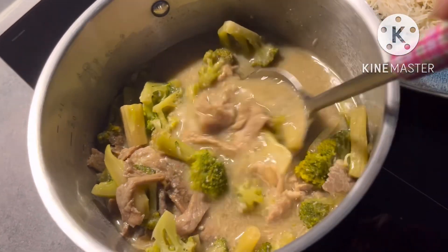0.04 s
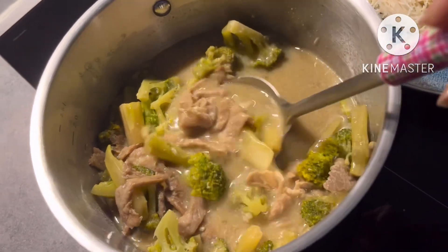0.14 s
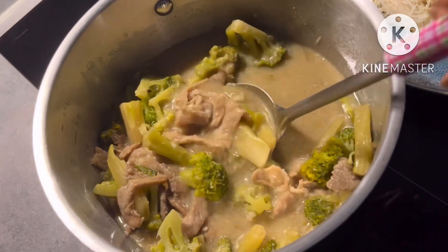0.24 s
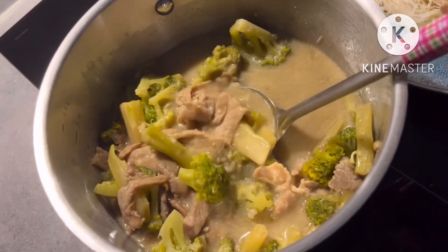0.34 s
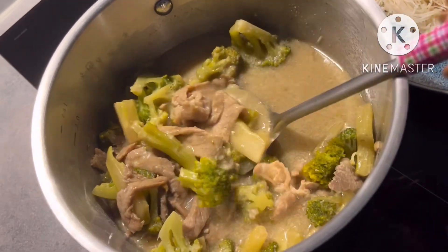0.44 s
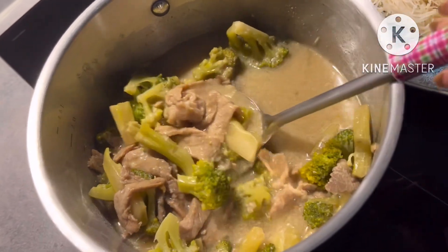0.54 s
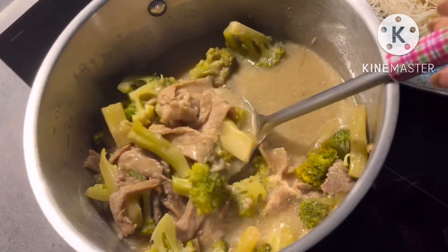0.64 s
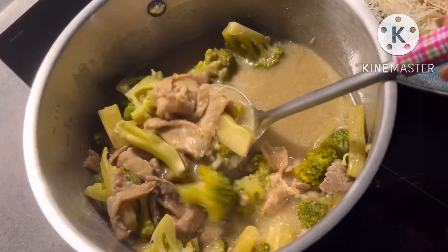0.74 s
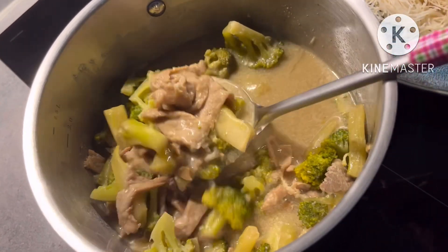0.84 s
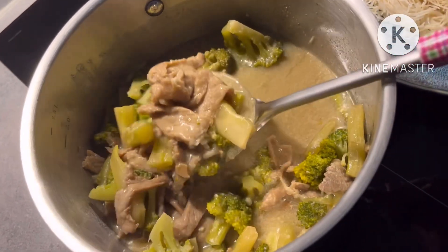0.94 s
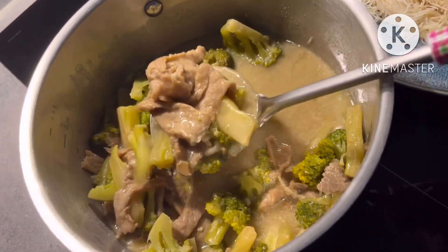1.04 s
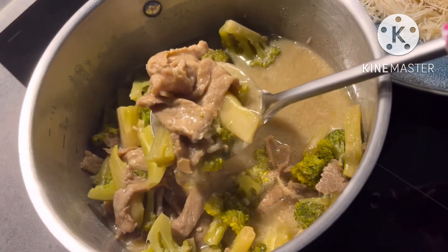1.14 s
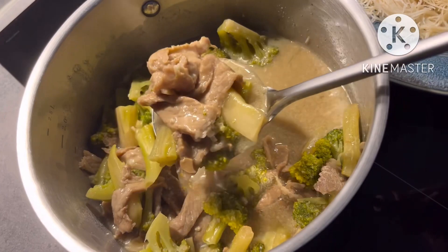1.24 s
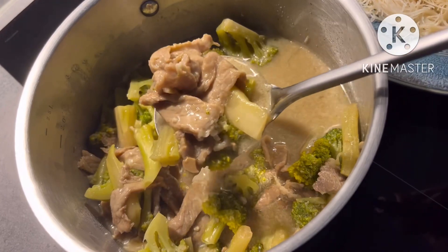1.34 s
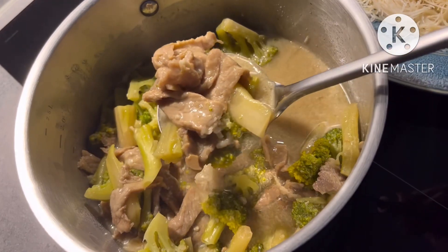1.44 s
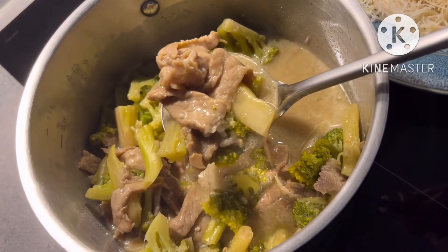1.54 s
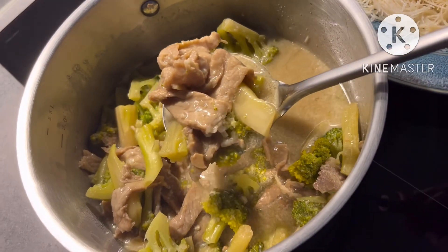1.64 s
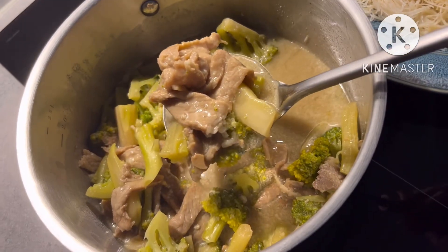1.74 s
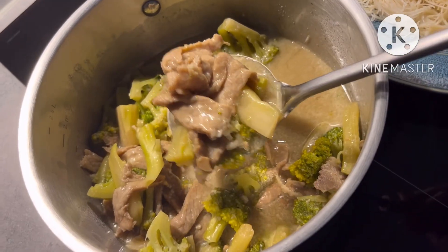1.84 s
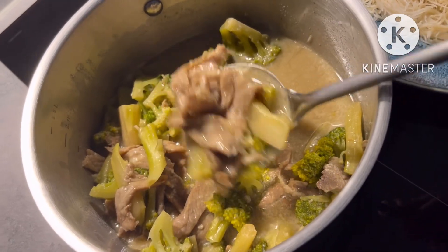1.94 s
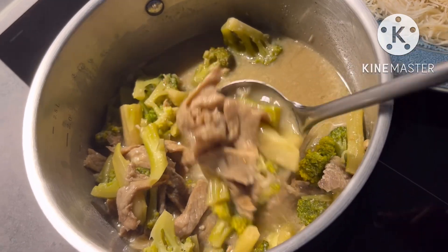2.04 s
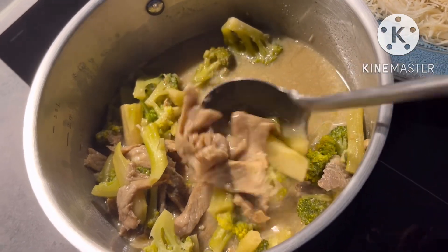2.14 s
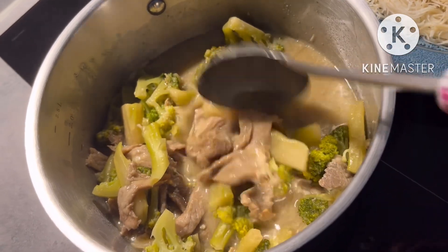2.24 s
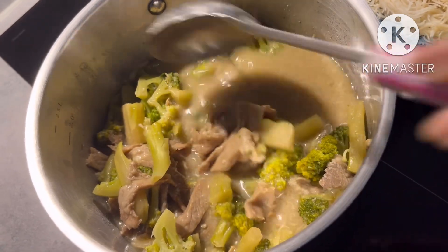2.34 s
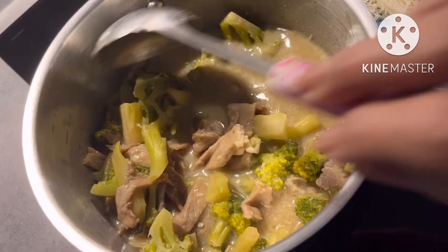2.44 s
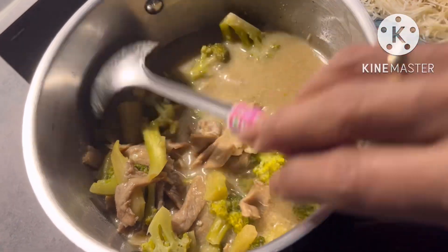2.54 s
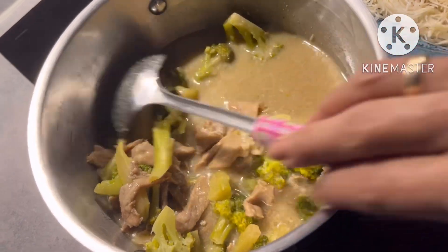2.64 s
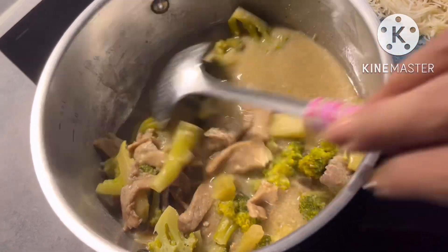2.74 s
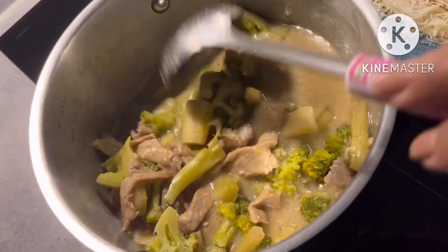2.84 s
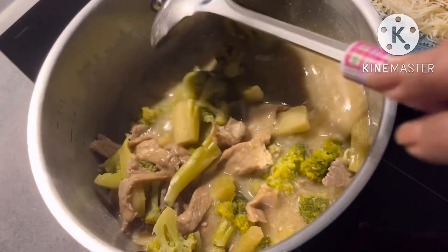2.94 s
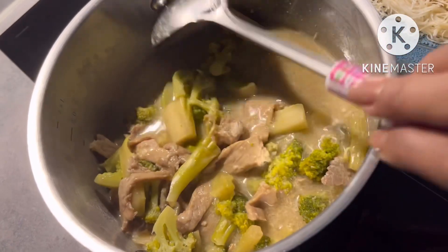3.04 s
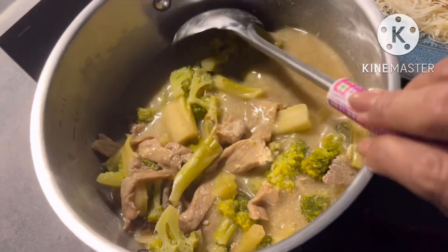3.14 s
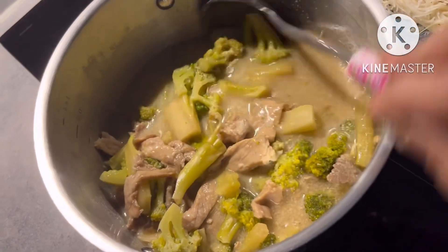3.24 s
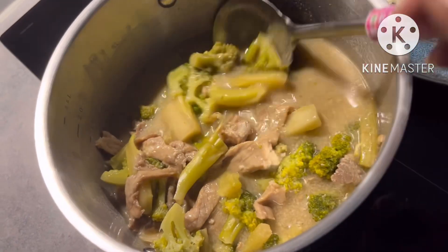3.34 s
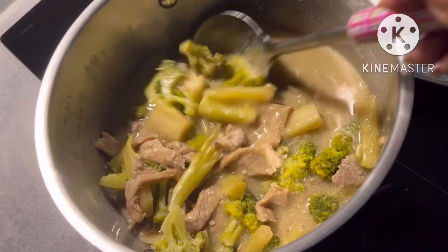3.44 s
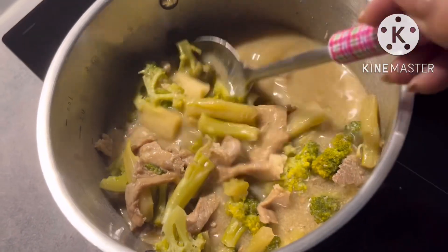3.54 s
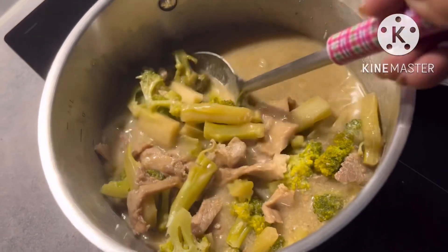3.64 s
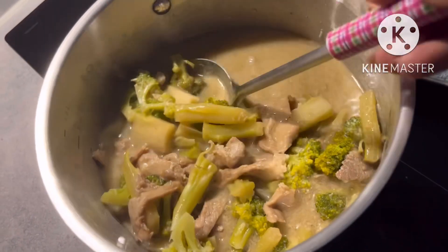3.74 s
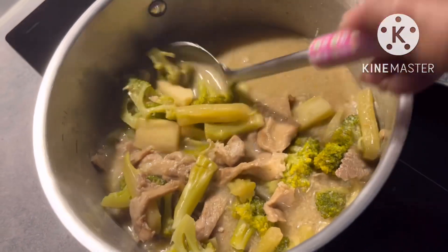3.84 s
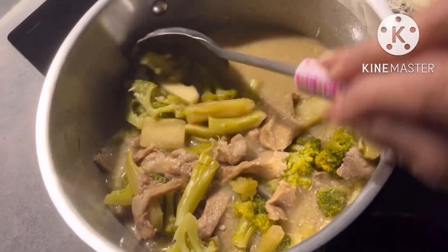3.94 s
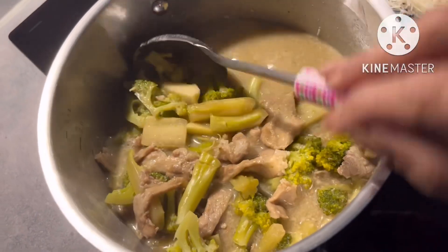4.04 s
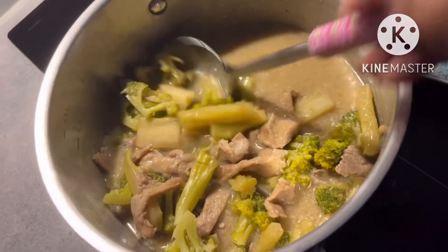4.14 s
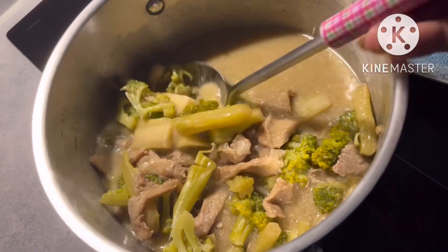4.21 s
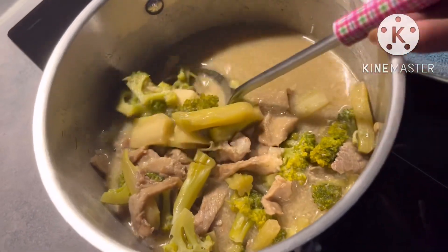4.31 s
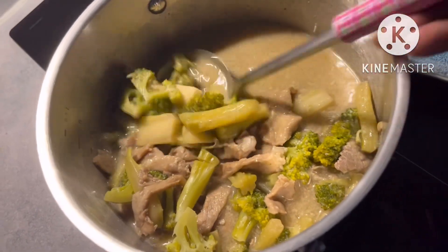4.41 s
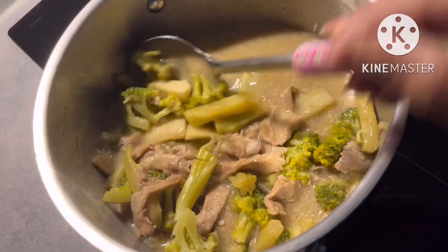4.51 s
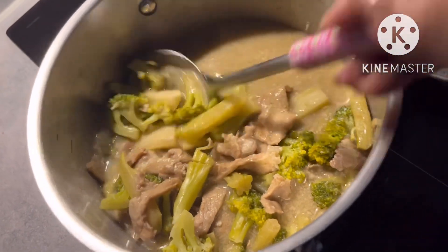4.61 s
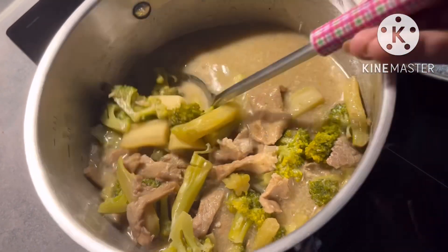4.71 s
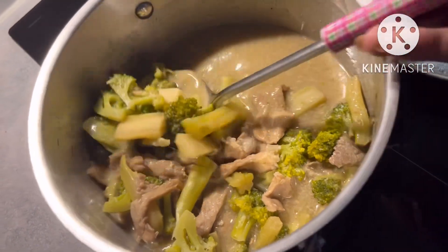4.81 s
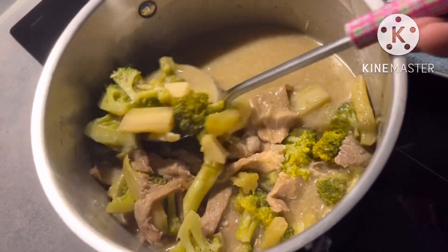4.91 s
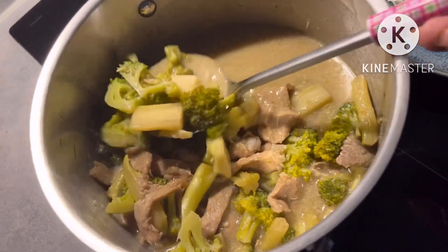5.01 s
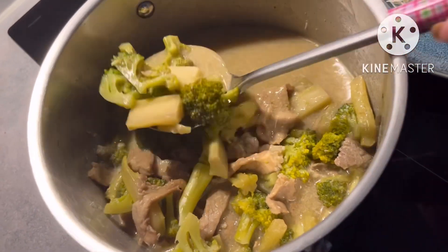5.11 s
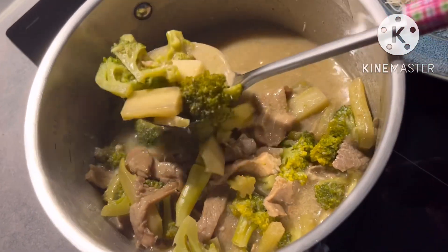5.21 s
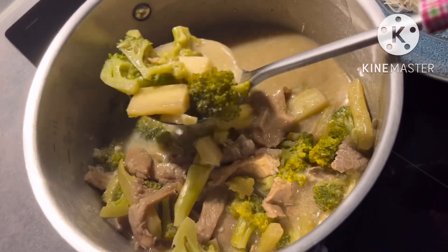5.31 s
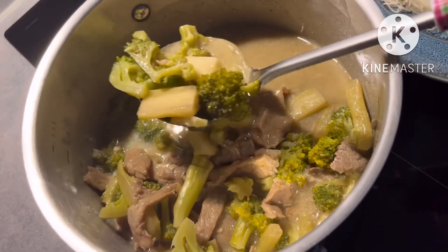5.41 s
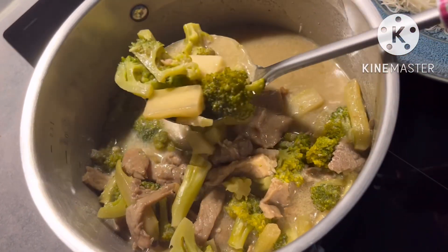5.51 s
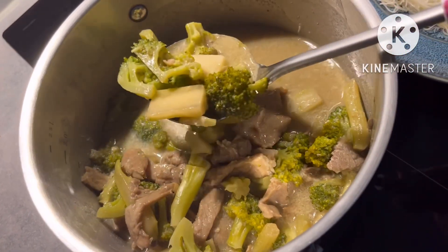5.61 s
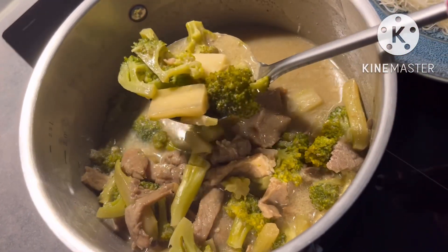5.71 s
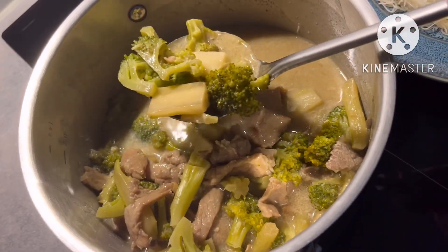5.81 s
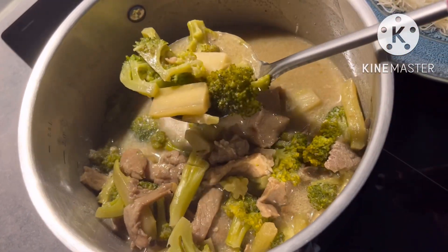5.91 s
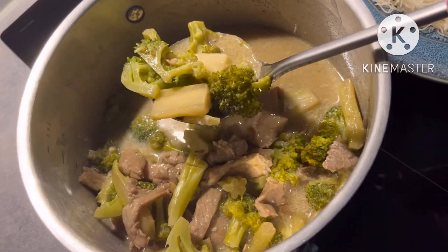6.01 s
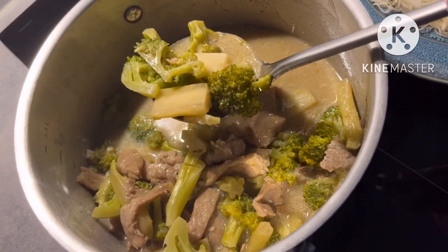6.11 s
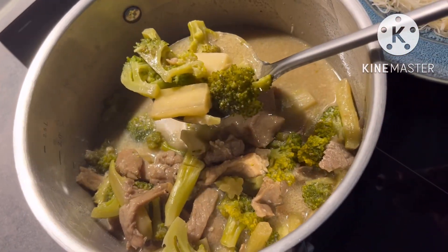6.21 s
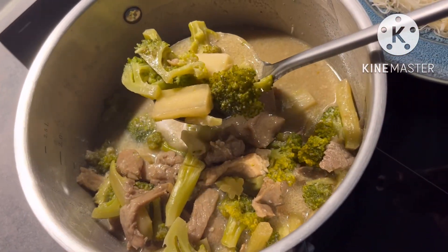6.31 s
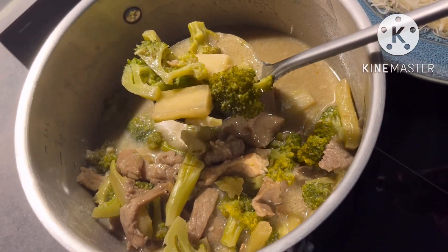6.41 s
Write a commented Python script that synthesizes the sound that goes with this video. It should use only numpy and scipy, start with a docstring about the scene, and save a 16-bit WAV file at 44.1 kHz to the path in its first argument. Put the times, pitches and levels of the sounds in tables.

```python
"""Steel ladle in a pot

Close on a thin steel pot in a small kitchen, with a stereo microphone. A ladle scoops food: its knocks
on wall and bottom and the grit of its slides set the steel ringing, and wet food ticks as it parts.
Behind the pot, a low hum wavers slightly over a very quiet room."""
import sys
import numpy as np
from scipy import signal
from scipy.fft import rfft, irfft, next_fast_len
from scipy.io import wavfile

SR = 44100
rng = np.random.default_rng(int(sys.argv[2]) if len(sys.argv) > 2 else 0)


def dump_mix(stems):
    """Bounce the given channels to the path in sys.argv[1] as a 16-bit WAV at rate SR."""
    frames = np.atleast_2d(stems).T  # one column per channel
    limited = np.clip(frames, -1, 1)  # hard clip at full scale
    pcm = np.round(limited * 32767).astype(np.int16)
    wavfile.write(sys.argv[1], SR, pcm)


N = 284886
HOP = 32   # samples between updates of the rubbing
CONTROL_S = np.arange(0, N + HOP, HOP) / SR

# Centres of six pitch ranges: (thud [Hz], body [Hz], hollow [Hz], wall [Hz], ladle [Hz], edge [Hz])
RANGES_HZ = [170, 430, 750, 1200, 3300, 8600]
# Ladle knocks; thud, wall, edge and jolt are set against the strength, body against the thud:
# (time [s], strength [dB], thud [dB], wall [dB], edge [dB], jolt [dB], ring left by the food [dB],
# favoured mode [Hz], body [dB], shudder [dB])
KNOCKS = [(0.062, -34.5, -34, -10.5, -7, -40, -7.5, 4000, 7, -3),
          (0.123, -48.5, -27, -11, 6, -7, -2, 2390, 7, -4),
          (0.46, -43, -18, -13.5, -18, -39, -3, 2760, -18, 3.5),
          (0.5, -48.5, 10, 4.5, -25, -9, -3, 3680, 1, 3),
          (0.657, -37.5, -13.5, -13.5, -21, -10, -9, 2580, -18.5, -0.5),
          (0.754, -39, -8.5, -20, -32, -14, -9.5, 1210, -36, -4.5),
          (2.139, -39, -55, -13, -6.5, -23, -40, 2450, 12.5, -17),
          (2.528, -34.5, -9, -6.5, -52, -38, -4, 2280, 7.5, -0.7),
          (2.597, -38, -11.5, -29, -7.5, -32.5, 0, 8220, -6, -1.5),
          (2.997, -15.5, -16.5, -10, -6, -44.5, -5.5, 2560, 1, -1),
          (3.078, -45.5, -6, -9, 11.5, -34.5, 0.5, 3750, -4, -12),
          (3.114, -38, -10.5, -14, -6.5, -11, 5.5, 3800, -3, 8.5),
          (3.156, -36, -15, -33, -13, -4.5, -21, 4420, -8.5, -16),
          (3.203, -4, -30.5, -16, -14, -27.5, -7.5, 2870, 11, -2.5),
          (3.898, -39.5, -13, -10, -13.5, -29, -11, 1227, -6, -4.5),
          (4.029, -16, -7, -12.5, -9.5, -31, -14.5, 2450, -10.5, -0.4),
          (4.042, -28, -1, -14.5, -13, -5, -4, 2170, -24, -13),
          (4.165, -30.5, -29, -7, -10, -16, -14, 2200, -6, -3),
          (4.511, -16.5, -25.5, -22.5, -14, -35, -9.5, 2498, -3, 0.7),
          (4.734, -58, 0, -20, -14.5, 21, -1, 375.9, -17, 11.5),
          (4.965, -32.5, -5.5, -6, -12, -12, -9, 375.7, -13.5, 0.9)]
# Modes that a knock drives above or below their usual share: (knock time [s], mode [Hz], boost [dB])
ACCENTS = [(0.123, 8700, 5.5), (0.46, 8030, 6), (0.46, 4000, 11), (0.5, 1184, -3), (0.658, 3380, 11),
           (0.658, 4000, 14), (0.658, 7680, 9), (0.754, 3618, 11), (2.528, 222, 7), (2.528, 499, 8),
           (2.528, 1028, 2), (2.528, 1184, 12), (2.595, 3740, 16), (2.595, 4885, 10), (2.997, 499, 12),
           (2.997, 737, -11.5), (2.997, 1028, 5.5), (2.997, 1184, 8), (2.997, 1262, -6.5),
           (2.997, 2450, -14), (2.997, 2560, 8), (2.997, 3618, -8), (2.997, 377, 7), (2.997, 2826, 5),
           (2.997, 4000, 3.5), (3.203, 142, 13.5), (3.203, 377, 15.5), (3.203, 737, -10),
           (3.203, 1460, -10.5), (3.203, 4000, -6), (3.203, 2170, 4), (3.203, 1028, 5.5),
           (3.203, 1262, 7.5), (3.203, 1850, -3), (3.203, 2450, 5.5), (3.203, 3380, 5.5), (3.203, 4885, 10),
           (3.203, 4230, 8), (3.203, 4630, -6), (4.029, 172, 1), (4.029, 222, 5.5), (4.029, 737, 21.5),
           (4.029, 1262, 13.5), (4.029, 4630, 12), (4.029, 4885, 0.5), (4.165, 1262, 15.5),
           (4.165, 1028, -10), (4.165, 4630, -15), (0.5, 377, -14), (0.5, 222, -11), (4.029, 377, -8.5),
           (4.043, 377, -14), (4.043, 222, -6.5), (2.528, 377, -6), (4.165, 7680, 15), (4.029, 7680, -0.5),
           (0.658, 2560, -1), (0.754, 1184, 7), (2.595, 8030, 4), (4.511, 1850, 8), (4.511, 4000, 7),
           (4.511, 4330, 7), (4.965, 142, 7.5), (4.965, 1028, 7), (4.965, 1184, 7.5)]


def from_db(db):
    return 10 ** (np.asarray(db) / 20)


def unit_rms(x):
    return x / np.sqrt(np.mean(x ** 2) + 1e-20)


def at_hz(hz, points_hz, values):
    """Rows of values joined by straight lines on a log-frequency axis."""
    place = np.interp(np.log(hz), np.log(points_hz), np.arange(len(points_hz)))
    k = min(int(place), len(points_hz) - 2)
    return values[k] + (place - k) * (values[k + 1] - values[k])


def nearness(hz, centre_hz, octaves):
    return np.exp(-(np.log2(hz / centre_hz) / octaves) ** 2)


def panned(left_db):
    return from_db(np.array([[left_db], [-left_db]]) / 2)


def ring(force, hz, t60):
    """A unit click sets a sine of height 1 ringing."""
    r, w = from_db(-60 / (t60 * SR)), 2 * np.pi * hz / SR
    return signal.lfilter([0, np.sin(w)], [1, -2 * r * np.cos(w), r * r], force + 1e-18)


def band(x, low, high):
    sos = signal.butter(2, [low, min(high, .47 * SR)], "band", fs=SR, output="sos")
    return signal.sosfilt(sos, x + 1e-18)


def add(out, starts, shapes):
    """Lays stereo shapes (2, events, samples) down at their start samples."""
    for c in range(2):
        np.add.at(out[c], np.minimum(starts[:, None] + np.arange(shapes.shape[2]), N - 1), shapes[c])


def room_tone(level_db=-75.5):
    """The quiet kitchen around the microphone: half-octave bands of noise, most alike in the bass."""
    # Room spectrum: (frequency [Hz], relative density [dB])
    spectrum = [(36, -28), (62, -4.5), (77, -24.5), (106, -28), (204, -33.5), (283, -37), (375, -35),
                (496, -42), (4360, -54), (6330, -57.5), (11000, -61), (15000, -63.5), (16500, -66)]
    # Likeness of left and right: (frequency [Hz], correlation [0-1])
    likeness = [(60, 0.93), (240, 0.72), (950, 0.031), (3770, 0.06), (15000, 0.35)]
    out, edges = 0, 56 * 2 ** np.arange(0, 8.6, .5)
    white = rng.standard_normal((2, 2, N))
    for k, (low, high) in enumerate(zip(edges, edges[1:])):
        mid, side = band(white[k % 2], low, high)
        hz = np.sqrt(low * high)
        alike = at_hz(hz, *np.transpose(likeness))
        stereo = np.sqrt(1 + alike) * mid + np.sqrt(1 - alike) * side * [[1], [-1]]
        out += from_db(at_hz(hz, *np.transpose(spectrum))) * stereo
    return from_db(level_db) * out / np.std(band(out[0], 99, 16000))


def hum(hz=48.6, width_hz=11, tone_to_noise=23.0, level_db=-58.5):
    """A low background tone, mixed with noise in a narrow resonance so that it wavers."""
    t60 = np.log(1000) / (np.pi * width_hz)
    noise = rng.standard_normal(N + SR)
    waver = unit_rms(ring(ring(noise, hz, t60), hz, t60)[SR:])
    tone = np.sin(2 * np.pi * hz * np.arange(N) / SR)
    return from_db(level_db) * unit_rms(tone_to_noise * tone + waver) * panned(1.1)


def slide_power(set_in_s=0.0017, lift_db_per_s=422, wall_share=0.36):
    """The ladle sets in, rubs along the steel and lifts off: power in each range over time."""
    # Long slides, one list a stroke; the last three columns are set against the level:
    # (time [s], level [dB], thud [dB], hollow [dB], edge [dB])
    slides = [
        [(0.0, -58, 17, -1, -3.5), (0.02, -62.5, -68, -6.5, -4), (0.058, -58.5, -20, -1, -1.5),
         (0.176, -62.5, -38.5, -2, -5), (0.22, -66.5, -9, 4, 0.5), (0.328, -83, -6, 7.5, 0.5),
         (0.36, -78.5, 7.5, 17.5, 3), (0.442, -76, -7, 2, -5.5), (0.455, -80, 1, 1, 3)],
        [(3.31, -53, 8, -16, -19), (3.454, -60, 10, -15, -1.5), (3.554, -62.5, 7.5, 0, 5.5),
         (3.606, -67.5, -4.5, 11.5, -3), (3.754, -72, 12.5, -5, -10.5), (3.824, -67.5, 6, 9.5, 2),
         (3.892, -56, -6.5, -11, -5.5), (3.916, -81, 8, 14, -5), (3.97, -79, 22, -14, -11)],
    ]
    # Short drags: (start [s], length [s], first level [dB], last level [dB], thud [dB], hollow [dB],
    # edge [dB])
    drags = [(0.468, 0.021, -69.5, -76, -3, 6, 5), (0.658, 0.069, -52.5, -70.5, -15, -15, -4),
             (0.755, 0.099, -58.5, -87.5, -19, -18, -5.5), (2.578, 0.26, -59, -87.5, 9, -17, -11.5),
             (2.585, 0.0052, -54, -43.5, -8, -16, -6.5), (3.034, 0.4, -52, -58.5, -4, -8.5, -3.5),
             (3.208, 0.08, -34, -35.5, -7, -14.5, -6), (4.054, 0.051, -55, -43, -1.4, -21.5, -6.5),
             (4.164, 0.21, -51.5, -85.5, 6, -13.5, -10), (4.552, 0.13, -59.5, -61.5, 5, -13.5, -6.5),
             (4.725, 0.089, -69, -87, 10.5, -14.5, -1.5), (4.995, 0.14, -66.5, -79, 13.5, 1, -14)]
    # Colour of the rubbing, thud to edge: (level [dB])
    colour_db = [-10, -5.5, 4.5, -2, -5.5, -1]
    short_strokes = [[(start, first, *colour), (start + length, last, *colour)]
                     for start, length, first, last, *colour in drags]
    power = np.full((len(RANGES_HZ), len(CONTROL_S)), 1e-13)
    for stroke in slides + short_strokes:
        when, *columns = np.transpose(stroke)
        level, thud, hollow, edge = [np.interp(CONTROL_S, when, c) for c in columns]
        set_in = np.clip(1 + (CONTROL_S - when[0]) / set_in_s, 0, 1)
        level -= lift_db_per_s * np.maximum(CONTROL_S - when[-1], 0)
        ranges_db = np.array([thud, thud, hollow, wall_share * hollow, np.zeros_like(edge), edge])
        power += (set_in * from_db(level + ranges_db + np.array(colour_db)[:, None])) ** 2
    return power


def rubbed_spot():
    """The spot under the ladle favours two pitches until the ladle moves on."""
    # Rubbed spots: (start [s], lower mode [Hz], boost [dB], higher mode [Hz], boost [dB])
    spots = [(0.0, 750, 8.5, 8700, 14.5), (0.455, 1184, 7, 8030, 11.5), (0.655, 2620, 6.5, 7680, 5),
             (0.75, 1200, 15.5, 3500, 8), (2.52, 1050, 13, 3720, 3.5), (2.585, 3700, 10, 8030, -6),
             (2.99, 498, 12, 1184, 10.5), (3.068, 3730, 16, 8030, 4), (3.2, 2850, 9, 3380, 10),
             (3.275, 2940, 11.5, 4750, 8), (3.311, 380, 14, 2850, 10), (3.49, 1275, 21, 2170, 11),
             (3.588, 720, 10.5, 1262, 8.5), (3.82, 2130, 17.5, 8700, 6), (4.03, 1250, 8.5, 2170, 6),
             (4.085, 4630, 8, 8030, 4.5), (4.169, 2140, 11, 1262, 6.5), (4.51, 2300, 8, 4230, 9.5),
             (4.63, 740, 15, 2170, 1.5), (4.72, 1190, 8.5, 2170, 3.5), (4.96, 1060, 14.5, 4000, 5)]
    moves_s, *columns = np.transpose(spots)
    current = np.maximum(np.searchsorted(moves_s, CONTROL_S) - 1, 0)
    return np.array(columns)[:, current]


def knock_levels():
    """Each knock's dB in the six ranges: heavy ones fill thud and body, wall hits hollow and wall."""
    # Colour of the knocks, thud to edge: (level [dB])
    colour_db = [-1.5, 13.5, -12, 4.5, -11.5, 2.4]
    strength, thud, wall, edge, body = np.array(KNOCKS)[:, [1, 2, 3, 4, 8]].T
    ranges_db = np.array([thud, thud + body, wall, wall, np.zeros_like(edge), edge])
    return strength + ranges_db + np.array(colour_db)[:, None]


def knock_blows(rise_s=0.003, chatter_s=0.0018):
    """The contact closes, lands in full, then chatters: the whole blow and its landing, mid and side."""
    t, full = np.arange(700) / SR, round(rise_s * SR)
    fade = np.exp(-t / chatter_s) * np.minimum(t / rise_s, 1) ** 3
    rattle = rng.standard_normal((len(KNOCKS), 2, len(t))).transpose(1, 0, 2) * fade
    blows = rattle / np.sqrt(np.sum(fade ** 2))
    blows[0, :, full] = 1
    return blows, blows * (np.arange(len(t)) == full)


def knock_accents(weights):
    """Sums the weighted accents onto the knocks nearest them in time, in dB."""
    when, _, boost_db = np.transpose(ACCENTS)
    owner = np.argmin(np.abs(when - np.array(KNOCKS)[:, :1]), axis=0)
    return np.bincount(owner, boost_db * weights, len(KNOCKS))


def shudder_power(rise_s=0.011):
    """After each knock the ladle shudders against the steel: power in each range over time."""
    colour_db, fall_db_per_s = [-4, -2.5, 1, -13, -15, -23], [298, 602, 600, 720, 685, 591.6]
    power = 0
    for (start, *_, shudder_db), levels in zip(KNOCKS, knock_levels().T):
        since = CONTROL_S - start
        peak_db = (levels + colour_db + shudder_db)[:, None]
        fall_db = np.outer(fall_db_per_s, np.maximum(since - rise_s, 0))
        power += (np.clip(since / rise_s, 0, 1) * from_db(peak_db - fall_db)) ** 2
    return power


def ladle_force(grit_db=4.5):
    """Blows and gritty rubbing push on the steel; returns a function for that force at one pitch."""
    # Stereo width of the force: (frequency [Hz], side against mid [ratio])
    widths = [(100, 0.063), (300, 0.33), (700, 0.93), (2000, 0.14), (5000, 0.31), (8500, 0.096),
              (14000, 0.14)]
    starts = np.round(np.array(KNOCKS)[:, 0] * SR).astype(int)
    struck_db, rubbed_db = knock_levels(), 10 * np.log10(slide_power() + shudder_power())
    noise = rng.standard_normal((2, N))
    grit = unit_rms(noise * from_db(grit_db * np.minimum(rng.exponential(1, N), 6)))

    def force(hz, blows, knock_db, rub_db):
        side = at_hz(hz, *np.transpose(widths))
        to_stereo = np.array([[1, side], [1, -side]]) / np.sqrt(1 + side ** 2)
        rub_gain = np.repeat(from_db(at_hz(hz, RANGES_HZ, rubbed_db) + rub_db), HOP)[:N]
        push = panned(-1.2) * (to_stereo @ grit) * rub_gain
        knock_gain = panned(-1) * from_db(at_hz(hz, RANGES_HZ, struck_db) + knock_db)
        add(push, starts, np.tensordot(to_stereo, blows, 1) * knock_gain[:, :, None])
        return push
    return force


def steel_modes(force, landings, knock_db=-2.5, rub_db=-28.5, favour_db=13.5, spread_db=3.5):
    """Landings and grit set pot and ladle ringing; the spot touched favours some modes."""
    # Modes of pot and ladle: (frequency [Hz], level [dB], t60 [s])
    modes = [(142, -5.5, 0.36), (172, -8.5, .25), (222, 3.5, 0.15), (367, -24, 0.12), (377, -26, 0.55),
             (499, -9.5, 0.092), (737, -4, 0.13), (900, -9, 0.22), (1028, -4.5, 0.15), (1184, -6, 0.15),
             (1262, -3, 0.055), (1460, -12, 0.25), (1850, -10, 0.08), (2170, -10, 0.07),
             (2450, -10.5, 0.056), (2560, -11, 0.08), (2690, -13, 0.048), (2826, -15, .13),
             (2877, -16, .14), (2947, -16.5, .1), (3182, -14.5, .1), (3380, -11.5, 0.15),
             (3618, -10.5, 0.07), (3740, -6, 0.058), (4000, -10.5, 0.045), (4230, -7, 0.048),
             (4630, -12.5, .045), (4885, -8, 0.07), (7680, -12.5, 0.06), (8030, -5.5, 0.03),
             (8700, -3, 0.04), (9900, -5, 0.03)]
    free_ring_db, favoured_hz = np.array(KNOCKS)[:, 6:8].T
    lower_hz, lower_db, higher_hz, higher_db = rubbed_spot()
    modes_hz, accent_hz = np.array(modes)[:, 0], np.array(ACCENTS)[:, 1]
    accented_hz = modes_hz[np.argmin(np.abs(np.log(accent_hz / modes_hz[:, None])), axis=0)]
    out = np.zeros((2, N))
    for hz, level_db, t60 in modes:
        struck_db = favour_db * nearness(hz, favoured_hz, octaves=0.083)
        struck_db += free_ring_db + knock_accents(accented_hz == hz)
        struck_db += spread_db * rng.standard_normal(len(KNOCKS))
        # The moving edge finds and loses the mode for the first 1.5 s; then the last step holds.
        steps = rng.standard_normal(N // 1000 + 2)
        wander_db = 3.0 * np.interp(np.arange(len(CONTROL_S)) * 0.14, np.arange(len(steps)), steps)
        held, higher = nearness(hz, lower_hz, octaves=0.11), nearness(hz, higher_hz, octaves=0.085)
        tilt_db = -0.5 * np.log2(hz / 1000)
        rubbed_db = tilt_db + wander_db * (1 - held) + lower_db * held + higher_db * higher
        push = force(hz, landings, knock_db + level_db + struck_db, rub_db + level_db + rubbed_db)
        out += ring(push, hz, t60)
    return out


def contact_noise(force, blows, knock_db=25.5, rub_db=14.0, favour_db=13.5, octaves=0.3):
    """The clack and scrape of steel on steel, in third-octave bands that lean the way the modes do."""
    # Contact spectrum at the microphone: (frequency [Hz], level [dB])
    spectrum = [(100, 0.5), (250, 0.5), (450, -16), (750, -0.5), (1300, -2), (1650, -18.5), (2100, -1.5),
                (2900, -5), (5000, -5.5), (6500, -8.5), (8800, -6.5), (10500, -12), (11500, -20),
                (12500, -26), (14500, -23), (16000, -19)]
    knock_lean, rub_lean = 0.29, 0.41
    favoured_hz, accent_hz = np.array(KNOCKS)[:, 7], np.array(ACCENTS)[:, 1]
    lower_hz, lower_db, higher_hz, higher_db = rubbed_spot()
    out, edges = np.zeros((2, N)), 90 * 2 ** np.arange(0, 7.7, 1 / 3)
    for k, (low, high) in enumerate(zip(edges, edges[1:])):
        hz = np.sqrt(low * high)
        colour = (-1) ** k * from_db(at_hz(hz, *np.transpose(spectrum)))
        struck_db = knock_accents(nearness(hz, accent_hz, octaves))
        struck_db += favour_db * nearness(hz, favoured_hz, octaves)
        rubbed_db = lower_db * nearness(hz, lower_hz, octaves)
        rubbed_db += higher_db * nearness(hz, higher_hz, octaves)
        push = force(hz, blows, knock_db + knock_lean * struck_db, rub_db + rub_lean * rubbed_db)
        out += colour * band(push, low, high)
    return out


def shimmer(contact, count=170, low_hz=879.4, high_hz=11693):
    """The many small damped modes of thin wet steel, slightly out of phase between left and right."""
    place, size, left, offset = rng.random((count, 4)).T[:, :, None]
    hz = low_hz * (high_hz / low_hz) ** place
    t, t60 = np.arange(SR // 4) / SR, 0.1 * (hz / 1000) ** -0.056
    phases = 2 * np.pi * np.array([left, left + 0.063 * (offset - .5)])
    envelopes = (2.7 + size) * np.sqrt(hz / t60) * from_db(-60 * t / t60)
    response = np.sum(envelopes * np.sin(2 * np.pi * hz * t + phases), axis=1)
    response /= np.sqrt(np.sum(response ** 2, axis=1, keepdims=True))
    return signal.fftconvolve(contact, response, axes=1)[:, :N]


def hob_thump(hz=74.94, t60=0.2):
    """Each knock jolts the pot on the hob: a softened click rings one low mode."""
    when, strength_db, jolt_db = np.array(KNOCKS)[:, [0, 1, 5]].T
    jolts = np.zeros(N)
    jolts[np.round(when * SR).astype(int)] = from_db(strength_db + jolt_db)
    return ring(signal.lfilter([.01], [1, -.99], jolts), hz, t60)


def wet_ticks(gain_db=-0.5, decay_s=0.0021, rise_s=0.001, width_ratio=1.4):
    """A wet film snaps as the food parts: a very short puff of noise around its centre pitch."""
    # Snapping films: (time [s], level [dB], centre [Hz])
    ticks = [(0.294, -55.5, 2400), (0.3524, -53.5, 2800), (0.7998, -53, 7350), (0.8393, -59, 2500),
             (2.0584, -52.5, 3160), (2.061, -58, 8650), (2.0807, -53, 7850), (2.234, -47, 8600),
             (2.243, -50.5, 6960), (2.283, -64, 1340), (2.346, -53.5, 9100), (2.3612, -56, 8030),
             (2.4002, -52, 6950), (2.4169, -58, 2210), (2.417, -59, 7400), (2.817, -59, 1513),
             (4.4548, -52, 4930), (4.6, -45, 2220), (5.1365, -53, 8910), (5.148, -48, 7840),
             (5.163, -44, 7680), (5.174, -53.5, 4000), (5.899, -67, 4760)]
    out, t = np.zeros((2, N)), np.arange(600) / SR
    puffs = rng.standard_normal((len(ticks), len(t))) * np.exp(-t / decay_s) * np.minimum(t / rise_s, 1)
    for (start, level_db, hz), puff in zip(ticks, puffs):
        low, high = hz / width_ratio, hz * width_ratio
        snap = band(band(puff, low, high), low, high)
        snap *= from_db(level_db + gain_db) / np.abs(snap).max()
        add(out, np.array([round(start * SR)]), panned(-1.5)[:, :, None] * snap)
    return out


def kitchen(x, t60_s=0.33, dull_hz=3000, bass_cut_hz=250):
    """Echoes off the near walls: nine feedback delays a side, duller on every round, then scattered."""
    size = next_fast_len(N + SR)
    w = 2 * np.pi * np.arange(size // 2 + 1) / size
    t60 = t60_s / np.sqrt(1 + (w * SR / (2 * np.pi * dull_hz)) ** 2)
    response = np.zeros((2, len(w)), complex)
    for k, lag in enumerate((rng.uniform(0.0075, 0.032, 18) * SR).astype(int)):
        loop = from_db(-60 * lag / SR / t60) * np.exp(-1j * w * lag)
        response[k % 2] += loop / (1 - loop) * (-1) ** (k // 2)
    for lag in (47, 131, 211):
        delay = np.exp(-1j * w * lag)
        response *= (delay - .6) / (1 - 0.7 * delay)
    echoes = irfft(rfft(x.mean(axis=0), size) * response, size)[:, :N]
    thin_walls = signal.butter(2, bass_cut_hz, "high", fs=SR, output="sos")   # they let the bass out
    return signal.sosfilt(thin_walls, echoes)


def microphone_ports(x):
    """The microphone's body shifts and shades the sound between its two ports; each takes half."""
    # The pot at the two ports: (frequency [Hz], left lead [rad], left minus right [dB])
    shading = [(50, 0.13, 1.5), (125, -0.4, 1.5), (250, -0.5, 1), (807, -0.26, 1), (2500, -0.68, -2.57),
               (4682, -0.96, -5), (5620, 4, -1), (6920, 4, 1.5), (7830, 7.5, 1), (8500, 7.5, 2),
               (10280, 6.5, 0), (11600, 10.5, 4), (13600, 7.5, 0), (14900, 14, 1.5), (17000, 10, 3.5)]
    points_hz, lead, pan_db = np.transpose(shading)
    size = next_fast_len(N + 1024)
    hz = np.arange(size // 2 + 1) * SR / size
    half = np.exp(.5j * np.interp(hz, points_hz, lead)) * from_db(np.interp(hz, points_hz, pan_db) / 2)
    return irfft(rfft(x, size) * [half, 1 / half], size)[:, :N]


def scene():
    """The pot close to the microphone; the kitchen's echoes, room tone and hum behind it."""
    blows, landings = knock_blows()
    force = ladle_force()
    rings = steel_modes(force, landings)
    contact = contact_noise(force, blows)
    small_modes = from_db(-8) * shimmer(contact)
    wet = wet_ticks()
    pot = rings + contact + small_modes + hob_thump() + wet
    echoes = from_db(-19.5) * kitchen(pot + wet)   # the ticks go into the room at double strength
    return microphone_ports(pot) + echoes + room_tone() + hum()


def record(dry):
    """The microphone chain rounds the peaks and cuts below 38 Hz and towards 16.7 kHz."""
    x = .92 * np.tanh(dry / .92)
    x = signal.sosfilt(signal.butter(4, 38, "high", fs=SR, output="sos"), x)
    return signal.sosfilt(signal.cheby2(14, 70, 16700, fs=SR, output="sos"), x)


dry = scene()
out = record(dry)
dump_mix(out)
```